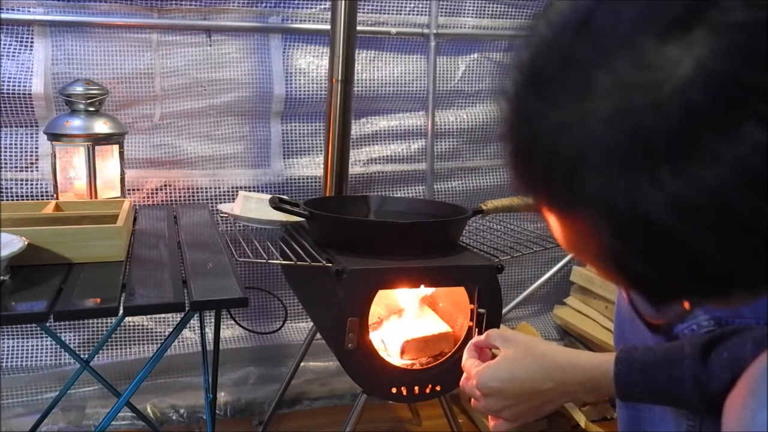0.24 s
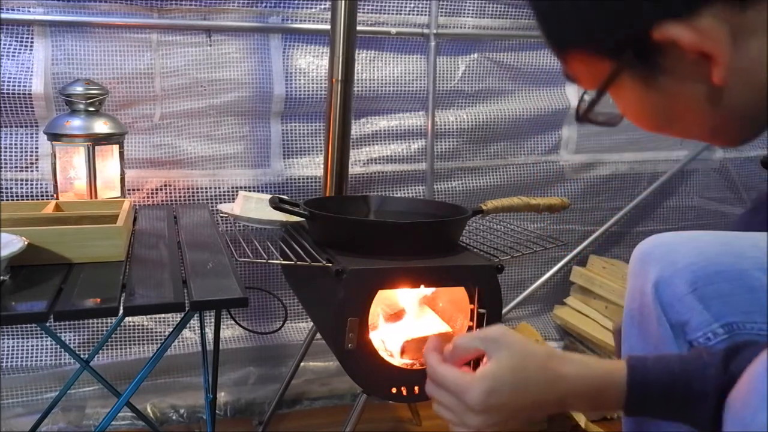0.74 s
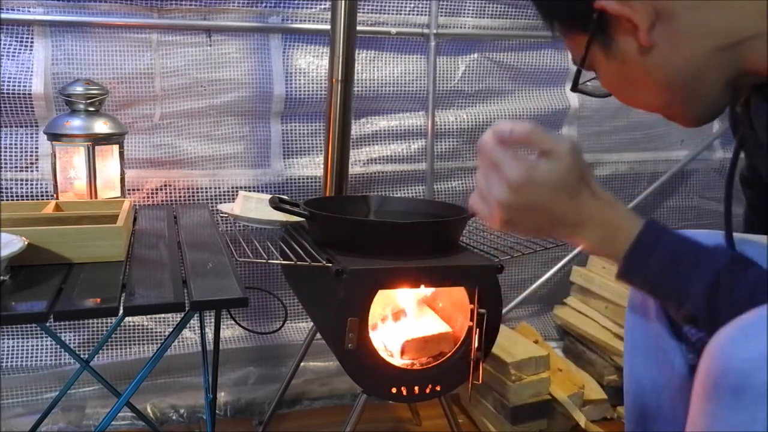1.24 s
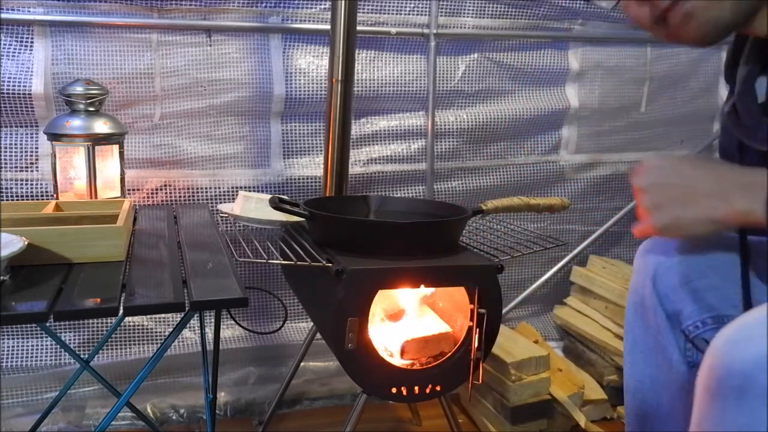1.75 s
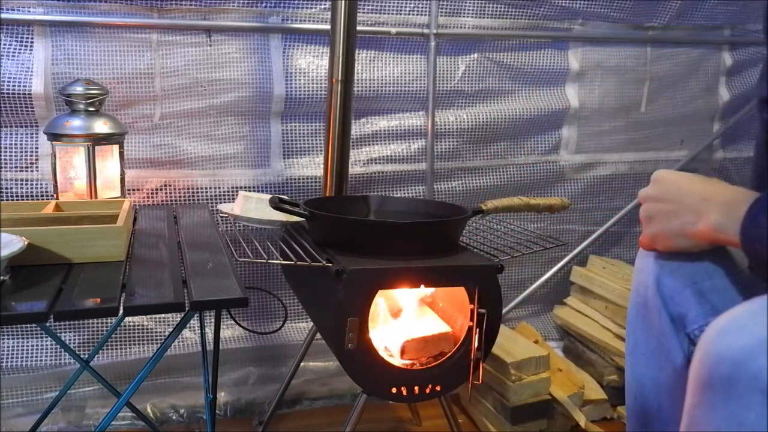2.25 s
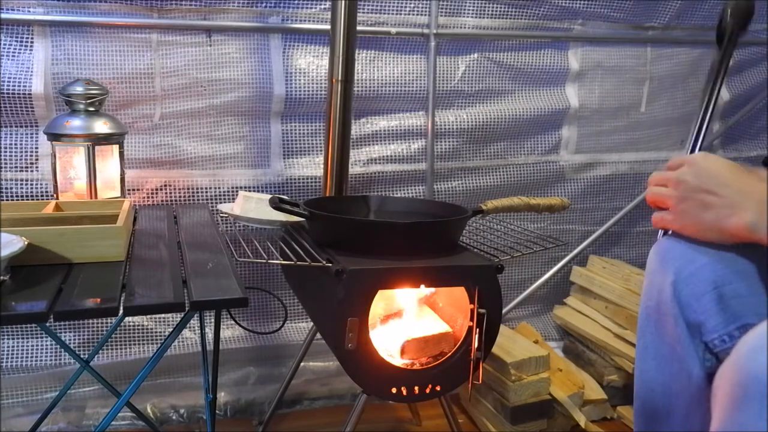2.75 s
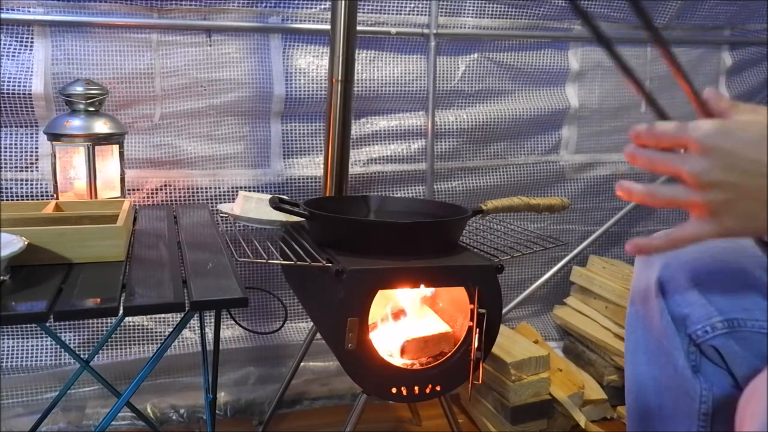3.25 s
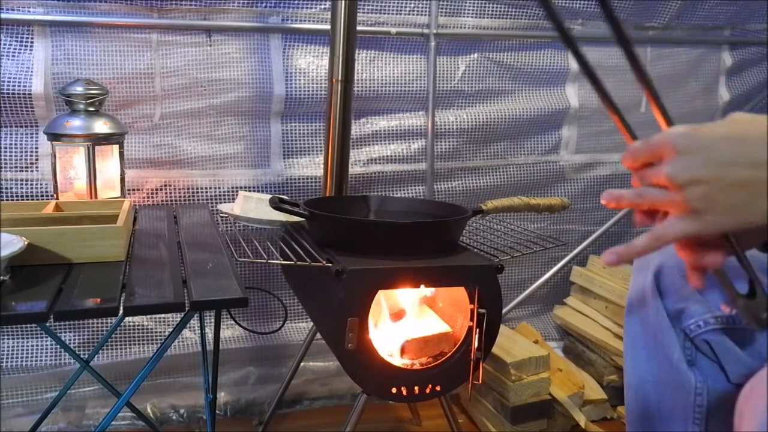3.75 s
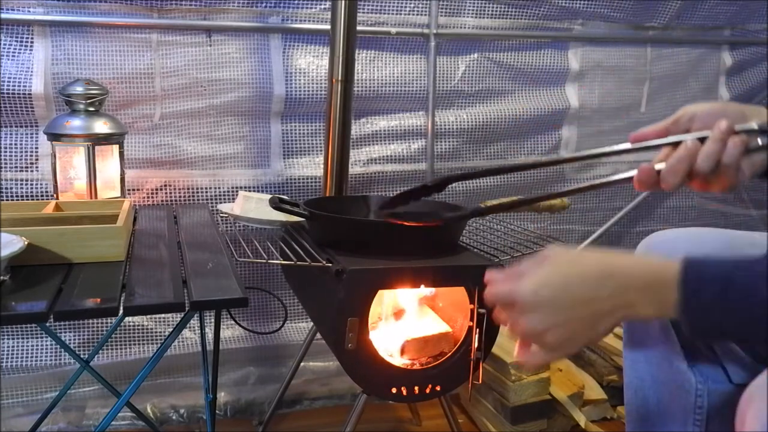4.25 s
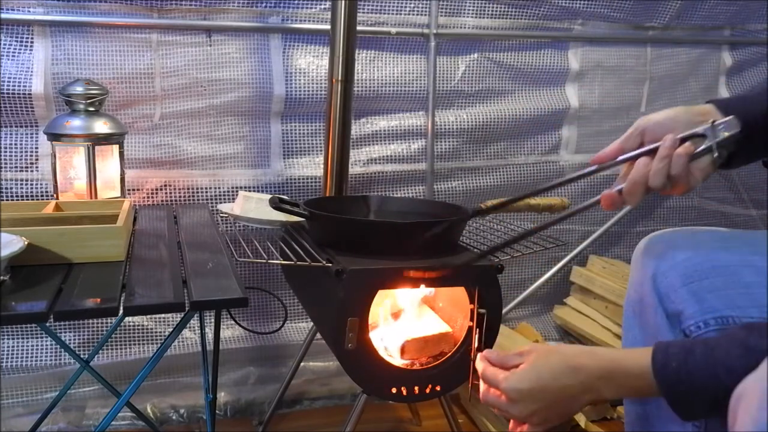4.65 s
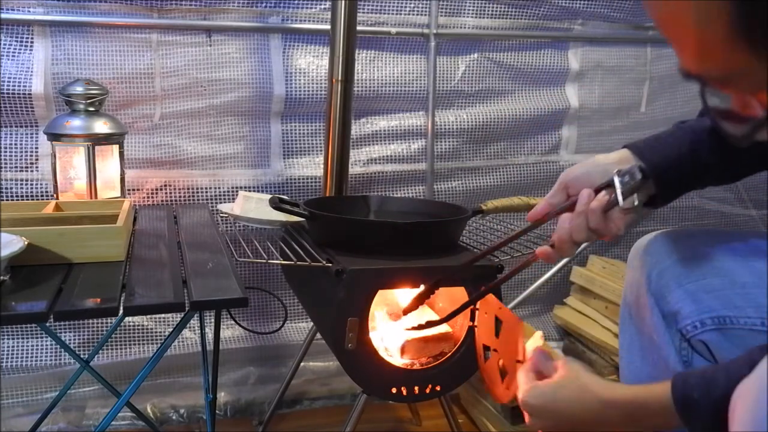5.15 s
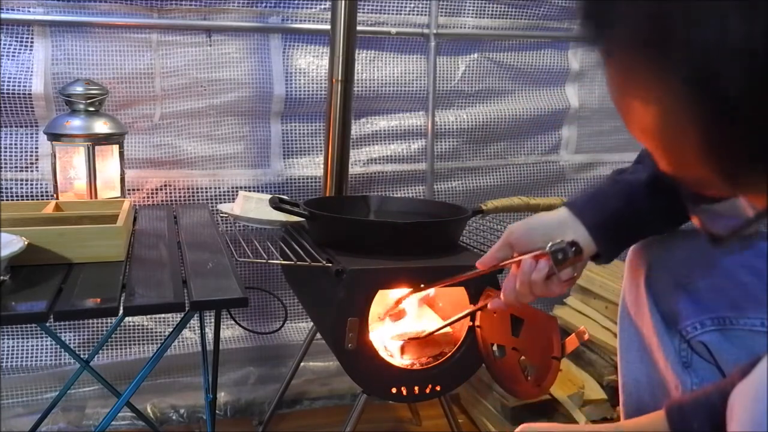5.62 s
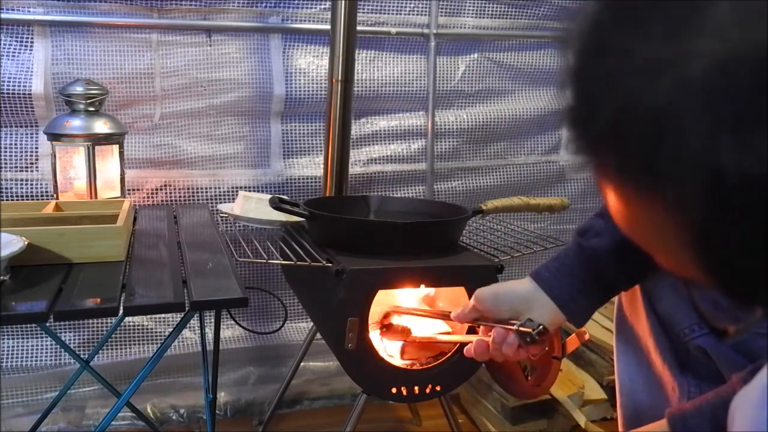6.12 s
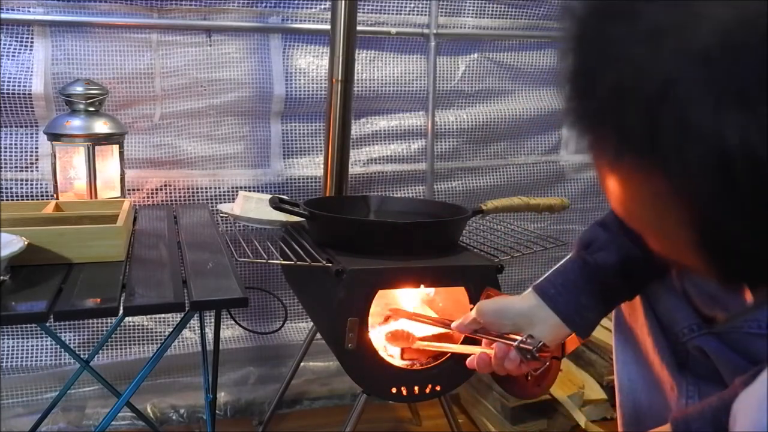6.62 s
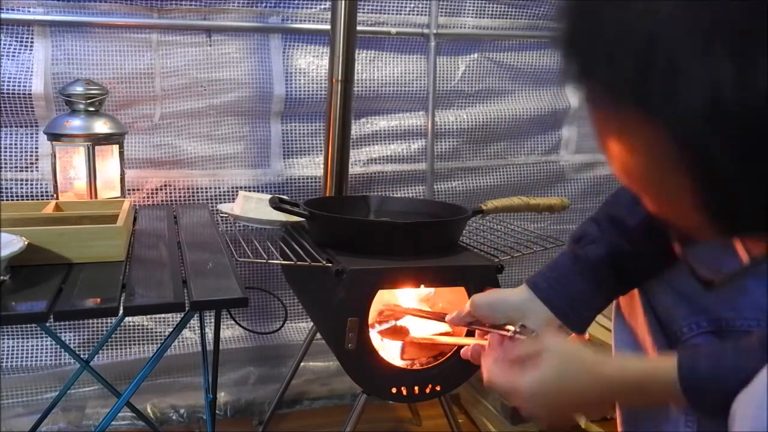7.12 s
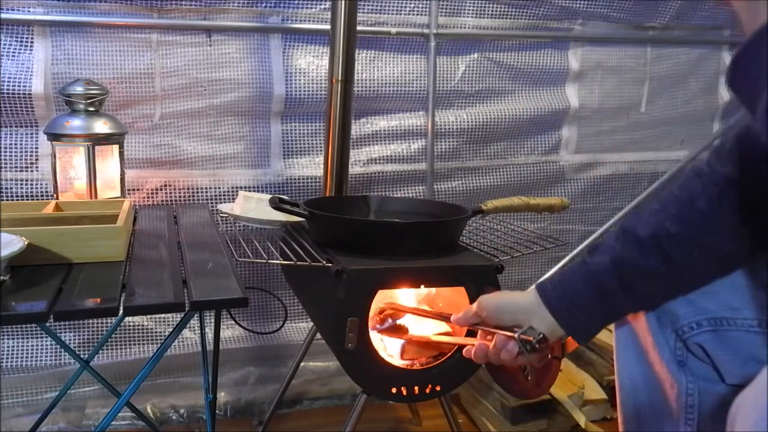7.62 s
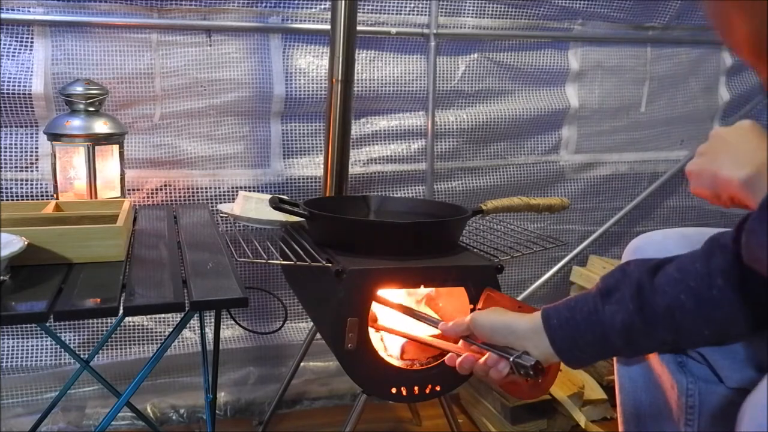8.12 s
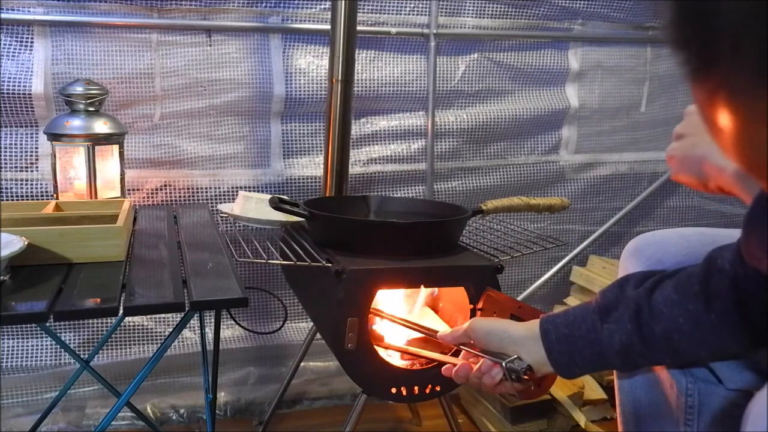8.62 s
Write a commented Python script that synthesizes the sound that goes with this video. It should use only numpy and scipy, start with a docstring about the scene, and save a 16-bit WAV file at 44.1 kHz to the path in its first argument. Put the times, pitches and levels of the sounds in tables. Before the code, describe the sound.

A wood fire roars softly in a tent while metal tongs ring and clatter, logs knock and a steel stove door opens.

```python
"""A fire roars low in a tent, over microphone hiss. A sleeve rustles; steel fire tongs are picked up
and ring as they clink and slide, while wood knocks softly and rasps. After the loudest clatter the
fire and hiss sink, then creep back. The latch of a small sheet-steel stove rattles, the hinge creaks,
and the door bangs and swings open, so the roar grows a little. Last, the tong tips scrape among
the logs, with more clinks and knocks."""
import sys
import numpy as np
from scipy import signal
from scipy.fft import rfft, irfft
from scipy.io import wavfile
from scipy.ndimage import uniform_filter1d

SR = 44100
rng = np.random.default_rng(int(sys.argv[2]) if len(sys.argv) > 2 else 0)


def transcribe(u):
    """Save the signal u as a 16-bit wav file named by the first command-line argument.

    u: samples, shape (n,) or (channels, n), limited to [-1, 1]; the rate is SR.
    q: integer samples, one column per channel.
    """
    v = np.clip(np.atleast_2d(u).T, -1, 1)
    q = np.round(v * 32767).astype(np.int16)
    wavfile.write(sys.argv[1], SR, q)


N = 391166
TIME = np.arange(N) / SR


def undb(db):
    """Turn decibels into a number to multiply by."""
    return 10 ** (np.asarray(db, float) / 20)


def unit(x):
    """Scale a sound to an average (rms) strength of 1."""
    return x / np.sqrt(np.mean(x ** 2))


def wander(rate_hz):
    """A smooth random curve, straying about 1 either side of zero."""
    hold = int(SR / rate_hz)
    steps = np.repeat(rng.standard_normal(N // hold + 1), hold)
    return 1.58 * uniform_filter1d(uniform_filter1d(steps, hold), hold)[:N]


def grains(grit_db, rate_hz):
    """Rough noise: its level flickers by about grit_db."""
    return rng.standard_normal(N) * undb(grit_db * wander(rate_hz))


def band(x, lo_hz, hi_hz):
    """Gently turn down everything outside two frequencies."""
    return signal.sosfilt(signal.butter(2, [lo_hz, hi_hz], "band", fs=SR, output="sos"), x)


def colour(noise, tones, bright_hz, spread_oct, between_db, sharp):
    """Make noise sound like an object: a hump at each of its tones, with weak ones filling the gaps."""
    hz, width, db = np.transpose(sorted(tones))
    f = np.maximum(np.arange(len(noise) // 2 + 1) * SR / len(noise), 1)
    outside_db = 25 * np.maximum(np.log2(hz[0] / f), 0) + 8 * np.maximum(np.log2(f / hz[-1]), 0)
    filler = undb(between_db + np.interp(f, hz, db) / 2 - outside_db) ** 2
    humps = sum(undb(d) ** 2 / (1 + (2 * sharp * (f - h) / w) ** 2) ** 2 for h, w, d in tones)
    focus = undb(-6 * (np.log2(f / bright_hz) / spread_oct) ** 2)
    return unit(irfft(rfft(noise) * np.sqrt(filler + humps) * focus, len(noise)))


def strike(hits, tones, contact_s, spread_oct, wash_db, crack_db, scatter_db=5, shaft_hz=0):
    """Each hit wakes clear tones, a noisy wash and a short crack. Ring time is the time to fade 60 dB."""
    hz, width, db = np.transpose(tones)
    out, t = np.zeros(N + SR), np.arange(SR // 3) / SR
    for start_s, peak_db, bright_hz, ring_s, *shaft_db in hits:
        tone_db = db + scatter_db * rng.standard_normal(len(hz))
        tone_db -= 6 * (np.log2(hz / bright_hz) / spread_oct) ** 2
        for grip_db in shaft_db:  # the lowest tone depends on where the hand grips
            tone_db = np.where(hz < shaft_hz, tone_db.max() + grip_db, tone_db)
        phase = rng.uniform(0, 2 * np.pi, len(hz))
        waves = np.sin(2 * np.pi * np.outer(hz, t) + phase[:, None])
        tone_ring_s = ring_s * (np.median(width) / width) ** .5  # narrow tones last longer
        clear = undb(tone_db) @ (waves * undb(-60 * np.outer(1 / tone_ring_s, t)))
        noise = colour(rng.standard_normal(len(t)), tones, bright_hz, spread_oct, -7.5, sharp=1.07)
        wash = noise * undb(wash_db - 60 * t / ring_s)
        crack = noise * undb(crack_db) * np.exp(-t / (3 * contact_s))
        attack = 1 - np.exp(-t / contact_s)
        hit = attack * (clear / np.abs(clear).max() + wash + crack)
        start = int(start_s * SR)
        out[start:start + len(t)] += undb(peak_db) * hit / np.abs(hit).max()
    return out[:N]


def swell(strokes, rise_db, fall_db):
    """Loudness curve: each stroke rises to its loudest moment, falls, and is silent outside."""
    gain = np.zeros(N)
    for start, loudest, end, db in strokes:
        times = [start, np.clip(loudest, start, end), end]
        level_db = np.interp(TIME, times, [db - rise_db, db, db - fall_db])
        gain += undb(level_db) * (TIME > start) * (TIME < end)
    return uniform_filter1d(gain, size=200)


def rub(contact, tones, bright_hz, ring_s, grit_db, between_db, sharp):
    """Rubbing is many tiny bumps that keep an object ringing; it fades once the contact ends."""
    keep = np.exp(-2 * np.log(1000) / (ring_s * SR))
    lingering = np.sqrt(signal.lfilter([1 - keep], [1, -keep], contact ** 2))
    return colour(grains(grit_db, 250), tones, bright_hz, 2.1, between_db, sharp) * lingering


# How strong the roar and hiss are, from low to high: f/Hz, level/dB
FIRE_SPECTRUM = [(15, -49), (25, -14.5), (55, -13), (145, -2.5), (277, -2), (354, -5), (503, -8.5),
                 (1370, -13.5), (1520, -18), (1650, -15.5), (2910, -20), (3620, -19), (4870, -19),
                 (14800, -23.5), (16000, -23)]
# How alike left and right are: f/Hz, likeness (0 to 1)
EAR_LIKENESS = [(25, .7), (100, 0.99), (500, .95), (2000, 0.78), (12000, 0)]
# Extra rush of the draught near 1200 Hz: t/s, level/dB
DRAUGHT_BOOST = [(0, 10), (.6, 4.5), (1.8, 3), (2.4, 5), (3.35, 2.5), (4.1, 6.5), (5.4, 3), (6.2, 2.5),
                 (8.87, 3)]
# Dips in the roar and hiss after the loudest clatter: t/s, depth/dB
FIRE_DIPS = [(1.89, 7), (2.32, 15.5), (3.7, 5.5), (3.83, 13), (5.63, 6.5)]

def fire_and_hiss(level_db=-52.5, sink_s=0.037, recover_db_per_s=16):
    """Noise in half-octave bands; the low ones flicker with the flames and grow once the door is open."""
    lost_db = np.zeros(N)
    for start_s, depth_db in FIRE_DIPS:  # each dip adds to what has not yet come back
        before = lost_db[int(start_s * SR)]
        sinking = before + depth_db * (TIME - start_s) / sink_s
        returning = np.maximum(before + depth_db - recover_db_per_s * (TIME - start_s - sink_s), 0)
        lost_db = np.where(TIME < start_s, lost_db, np.minimum(sinking, returning))
    hz = np.maximum(np.arange(N // 2 + 1) * SR / N, 1)
    shape_db, likeness = (np.interp(np.log(hz), np.log(f), values)
                          for f, values in (zip(*FIRE_SPECTRUM), zip(*EAR_LIKENESS)))
    noise = rfft(rng.standard_normal((2, N))) * undb(shape_db)
    shared, side = noise * np.sqrt([1 + likeness, 1 - likeness])
    left_right = np.array([shared + side, shared - side])
    draught_db = np.interp(TIME, *np.transpose(DRAUGHT_BOOST))
    open_door_db = np.interp(TIME, [5.8, 6.3], [0, 2.5])
    out = 0
    for centre_hz in 20 * 2 ** np.arange(0, 10.5, .5):
        window = np.cos(np.pi * np.clip(np.log2(hz / centre_hz), -.5, .5)) ** 2
        rush_db = draught_db * np.exp(-np.log2(centre_hz / 1200) ** 2 / 0.46)
        flicker_db = 2.25 * wander(5.5) / (1 + centre_hz / 900)
        roar_db = open_door_db / (1 + (centre_hz / 177) ** 2)
        out += undb(level_db - lost_db + rush_db + flicker_db + roar_db) * irfft(window * left_right, N)
    return out / np.std(band(irfft(shared, N), 100, 500))


# Arm movements: start/s, loudest/s, end/s, level/dB
SLEEVE_STROKES = [(.35, .37, .41, -57), (.76, .84, 1.0, -59), (1.1, 1.3, 1.45, -62.5),
                  (1.42, 1.48, 1.73, -48)]

def sleeve():
    """Cloth rustles as the arm moves."""
    rustle = unit(band(grains(grit_db=1.1, rate_hz=59.8), 1050, 7000))
    return rustle * swell(SLEEVE_STROKES, rise_db=7, fall_db=8)


# The tones the tongs ring with: f/Hz, width/Hz, level/dB
TONG_TONES = [(2223, 50, -2.5), (2580, 60, -4), (3406, 42, -4.5), (4124, 320, -0.5), (5090, 47, 0.5),
              (5550, 100, 1.5), (6160, 40, 1), (6920, 44, 1.5), (7530, 160, 0.5), (3700, 42, -1.5),
              (7860, 45, -2), (8296, 130, -4), (5735, 40, -3), (9300, 27, -14), (9800, 73, -19),
              (10000, 74, -22)]
# Clinks: t/s, level/dB, brightest f/Hz, ring time/s, low shaft tone against the strongest tone/dB
TONG_CLINKS = [(1.124, -35, 4930, .24, -8), (1.892, -6.5, 7600, 0.23, -4), (2.124, -25, 5260, .19, -30),
               (2.177, -15, 5940, 0.13, 7.5), (2.293, -15, 5400, 0.072, -1), (2.318, -5.5, 5700, 0.058, 6),
               (2.340, -9.5, 8600, 0.19, -9), (2.51, -51.5, 3570, 0.44, 7), (2.591, -30, 7600, .18, -8),
               (2.884, -35.5, 4320, 0.18, -16), (3.09, -38.5, 3520, 0.44, 5), (3.208, -28, 4120, .23, -5),
               (3.339, -27, 5300, 0.26, -4), (3.494, -40.5, 3610, 0.074, -24),
               (3.603, -27, 3640, 0.17, -18), (3.633, -27.5, 4210, 0.28, -15),
               (3.696, -10.5, 5100, 0.36, -11), (3.795, -12.5, 7400, 0.39, -20),
               (3.812, -10, 4420, 0.22, -16), (3.837, -11, 7660, .23, -28), (3.993, -21.5, 5836, .2, -40),
               (4.229, -48.5, 6300, 0.28, -20), (6.49, -41.5, 6000, .12, -24), (6.679, -25, 3900, .2, -28),
               (6.738, -38, 3900, .11, -21), (7.191, -24, 3800, 0.2, -5), (7.268, -18.5, 4400, 0.11, -25),
               (7.303, -9.5, 6200, 0.088, -19), (7.412, -35, 3770, .27, -20),
               (7.921, -29.5, 4840, 0.17, -25), (7.965, -34, 7744, 0.33, -24),
               (8.304, -35.5, 5330, 0.35, -23), (8.496, -37, 8286, 0.15, -18),
               (8.659, -39.5, 7153, .25, -23), (8.851, -41, 5986, 0.18, -6)]
# Steel sliding: start/s, loudest/s, end/s, level/dB
TONG_STROKES = [(1.745, 1.775, 1.83, -36), (1.855, 1.89, 1.9, -34), (2.19, 2.195, 2.26, -32.5),
                (2.22, 2.29, 2.346, -27.5), (3.61, 3.62, 3.67, -45), (3.682, 3.696, 3.69, -20),
                (3.72, 3.79, 3.87, -33.5), (6.13, 6.145, 6.35, -40.5), (6.81, 6.83, 6.87, -38.5),
                (7.25, 7.305, 7.37, -27.5), (7.36, 7.42, 7.477, -41.5), (7.2, 7.21, 7.26, -43),
                (8.135, 8.16, 8.13, -34.5)]

def tongs():
    """Steel tongs ring brightly when they are knocked or slide."""
    clinks = strike(TONG_CLINKS, TONG_TONES, contact_s=0.00077, spread_oct=1.32,
                    wash_db=-2.5, crack_db=-2, shaft_hz=2400)
    contact = swell(TONG_STROKES, rise_db=17, fall_db=14)
    return clinks + rub(contact, TONG_TONES, 5000, ring_s=0.11, grit_db=1, between_db=-14.5, sharp=7)


# The tones of the wood: f/Hz, width/Hz, level/dB
WOOD_TONES = [(110, 40, -8.5), (165.7, 26.5, -4), (279.6, 36, -2), (357.6, 47, -4.5), (504, 23, -12),
              (640, 72, -8), (903, 91, -7), (1170, 240, -5), (2020, 200, -4)]
# Knocks: t/s, level/dB, brightest f/Hz, spread around it/octaves
WOOD_KNOCKS = [(1.491, -40, 280, .62), (1.663, -31, 169, 0.34), (1.753, -24.5, 260, 1.1),
               (1.772, -25, 520, 0.84), (1.79, -22, 164, 0.59), (6.583, -25, 400, 1.8),
               (6.739, -38, 277, 1.3), (7.187, -39.5, 305, .81), (7.31, -31.5, 270, 0.51),
               (7.362, -33, 280, .62), (7.428, -39, 290, .46), (8.404, -31.5, 320.4, 0.52)]

def wood_knocks(ring_cycles=32.5):
    """Logs, floor and seat knock dully; lower knocks ring longer."""
    return sum(strike([(s, db, hz, ring_cycles / hz)], WOOD_TONES, contact_s=0.0057,
                      spread_oct=spread, wash_db=-18.5, crack_db=-13.5)
               for s, db, hz, spread in WOOD_KNOCKS)


# Logs being dragged: start/s, loudest/s, end/s, level/dB
LOG_STROKES = [(1.74, 1.774, 1.86, -38), (7.0, 7.014, 8, -53), (8.0, 8.13, 8.145, -42.5),
               (8.14, 8.16, 8.22, -35.5)]

def log_drag():
    """Wood dragged over wood and ash makes a gritty rasp with no ring."""
    rasp = unit(band(grains(grit_db=1.1, rate_hz=400), 1090, 6500))
    return rasp * swell(LOG_STROKES, rise_db=17, fall_db=19)


# The tones of the latch: f/Hz, width/Hz, level/dB
LATCH_TONES = [(4380, 1650, -15.5), (5230, 160, -5), (5720, 110, -1.5), (5800, 63, -2), (5970, 50, -10),
               (5990, 53, -2.5), (6890, 220, -10), (7470, 98, -8), (8440, 54, 0.5), (10000, 200, -37)]
# Clicks of its rattle: t/s, level/dB
LATCH_CLICKS = [(4.3705, -37), (4.394, -37), (4.415, -33), (4.436, -29.5), (4.469, -30.5), (4.485, -37),
                (4.5377, -30), (4.555, -36), (4.57, -30), (4.583, -31.5), (4.639, -29), (4.6668, -28.5),
                (6.304, -24.5), (6.36, -35)]
# The latch sliding: start/s, loudest/s, end/s, level/dB
LATCH_STROKES = [(4.36, 4.374, 4.56, -37.5), (6.29, 6.318, 6.41, -35)]

def latch(bright_hz=6500, ring_s=0.12):
    """The stove's latch rattles in quick, hard clicks as it slides."""
    hits = [(s, db, bright_hz, ring_s) for s, db in LATCH_CLICKS]
    rattle = strike(hits, LATCH_TONES, contact_s=0.00047, spread_oct=1.5,
                    wash_db=-9, crack_db=-4.5, scatter_db=2)
    contact = swell(LATCH_STROKES, rise_db=9, fall_db=20.5)
    return rattle + rub(contact, LATCH_TONES, 6270, ring_s=0.19, grit_db=2, between_db=-17, sharp=0.42)


# The tones of the hinge: f/Hz, width/Hz, level/dB
HINGE_TONES = [(1210, 60, 4), (1340, 70, -3)]
# Its turn: start/s, loudest/s, end/s, level/dB
HINGE_STROKES = [(5.14, 5.2, 5.34, -52)]

def hinge():
    """The hinge rubs as it turns and gives a faint creak."""
    contact = swell(HINGE_STROKES, rise_db=7, fall_db=9)
    return rub(contact, HINGE_TONES, 1250, ring_s=0.08, grit_db=3, between_db=-25, sharp=1.3)


# The tones of the stove door: f/Hz, width/Hz, level/dB
DOOR_TONES = [(555, 110, -6), (929, 59, 0.5), (1220, 47, 3.5), (1728, 120, -4), (1904, 50, -7),
              (2173, 50, 2), (2815, 62, -1), (3350, 48, -8), (4004, 120, -5.5), (4680, 45, -4.5),
              (5140, 37, -2.5), (5800, 120, -6), (6396, 92, -5), (7170, 44, -5), (8550, 110, -11.5),
              (10400, 200, -46)]
# Bangs: t/s, level/dB, brightest f/Hz
DOOR_BANGS = [(5.61, -6, 3200), (5.998, -23.5, 5499)]
# The door swinging: start/s, loudest/s, end/s, level/dB
DOOR_STROKES = [(5.64, 5.66, 5.82, -37), (5.8, 5.91, 5.96, -37), (5.965, 5.985, 6.03, -33.5)]

def door(ring_s=0.16):
    """The sheet-steel door rings when it bangs, and rubs as it swings."""
    hits = [(*bang, ring_s) for bang in DOOR_BANGS]
    bangs = strike(hits, DOOR_TONES, contact_s=0.0009, spread_oct=2.6, wash_db=-9, crack_db=1)
    contact = swell(DOOR_STROKES, rise_db=3, fall_db=5)
    return bangs + rub(contact, DOOR_TONES, 2480, ring_s=0.27, grit_db=1.1, between_db=-14, sharp=1.76)


# The tones of the tong tips: f/Hz, width/Hz, level/dB
TIP_TONES = [(2380, 43, -18), (4670, 100, -4.5), (5680, 59, 5.5), (7680, 180, 4), (7980, 29, 0),
             (8440, 42, -6), (8650, 38, -16), (10500, 80, -22)]
# Short scratches: t/s, level/dB
TIP_SCRATCHES = [(7.5588, -36.5), (7.5947, -34), (7.693, -33), (7.7693, -32), (7.8087, -32), (7.8347, -32),
                 (7.8551, -34)]
# Longer scrapes: start/s, loudest/s, end/s, level/dB
TIP_STROKES = [(6.128, 6.152, 6.21, -31), (6.182, 6.195, 6.25, -39), (6.806, 6.83, 6.875, -31),
               (7.55, 7.61, 7.89, -41.5)]

def tong_tips(bright_hz=6500, ring_s=0.11):
    """The tips ring thinly as they scratch and scrape among the logs."""
    hits = [(s, db, bright_hz, ring_s) for s, db in TIP_SCRATCHES]
    scratches = strike(hits, TIP_TONES, contact_s=0.0016, spread_oct=2.3, wash_db=-4, crack_db=-12)
    contact = swell(TIP_STROKES, rise_db=10.5, fall_db=14)
    return scratches + rub(contact, TIP_TONES, 6460, ring_s=0.14, grit_db=2, between_db=-10.5, sharp=0.7)


def scene(echo_s=0.042, echo_db=-25):
    """Close sounds reach both ears alike; the tent canvas sends each ear its own short echo."""
    near = sleeve() + tongs() + wood_knocks() + log_drag() + latch() + hinge() + door() + tong_tips()
    t = np.arange(SR // 4) / SR
    canvas = rng.standard_normal((2, len(t))) * undb(-60 * t / echo_s) * (t > .002)
    canvas /= np.sqrt(np.sum(canvas ** 2, axis=1, keepdims=True))
    echo = signal.fftconvolve(near[None], canvas, axes=1)[:, :N]
    return fire_and_hiss() + near + undb(echo_db) * echo


def record(dry):
    """Cut away the highest treble, above 15900 Hz."""
    return signal.sosfilt(signal.ellip(10, .2, 80, 15900, fs=SR, output="sos"), dry)


dry = scene()
out = record(dry)
transcribe(out)
```